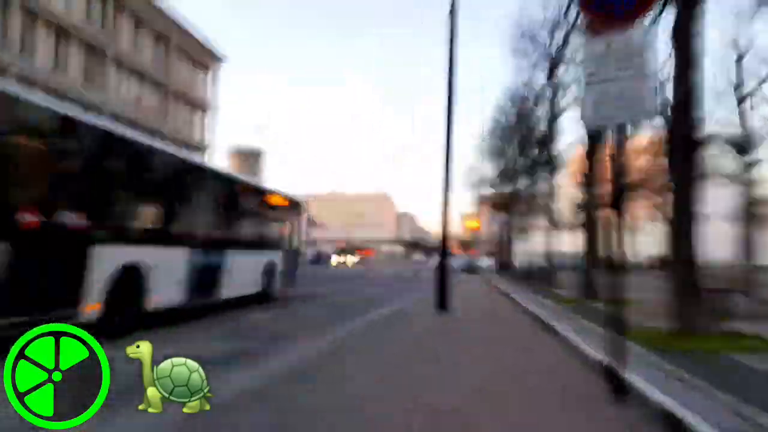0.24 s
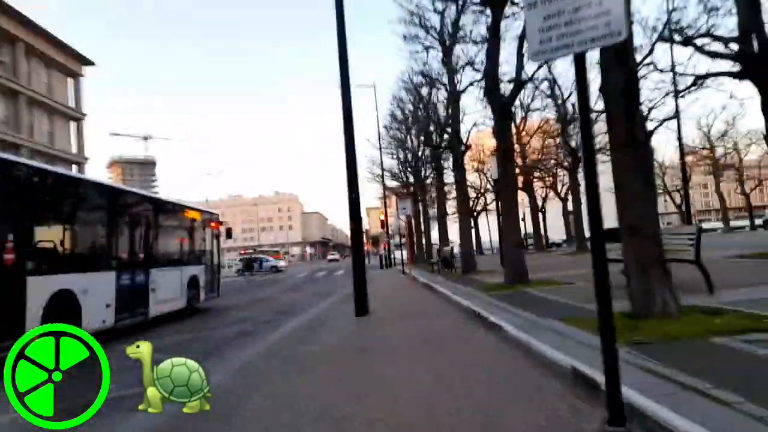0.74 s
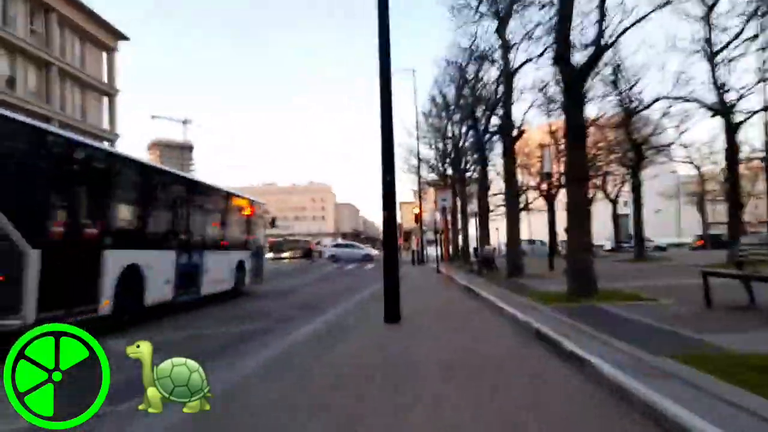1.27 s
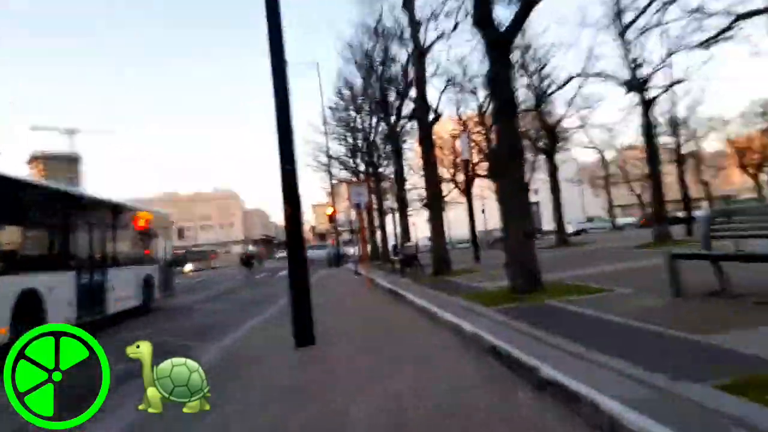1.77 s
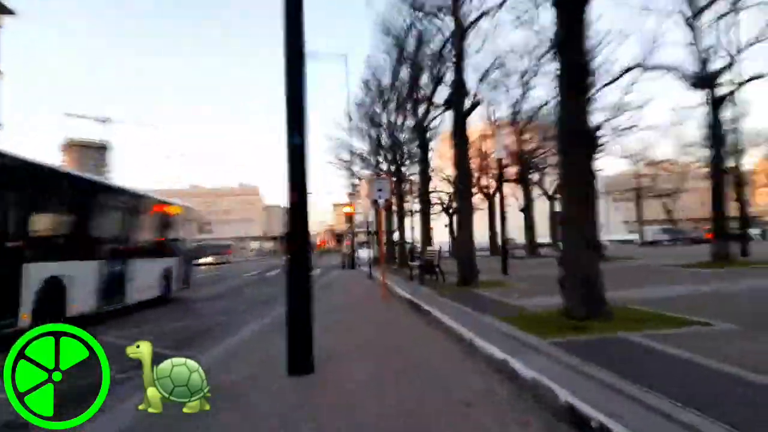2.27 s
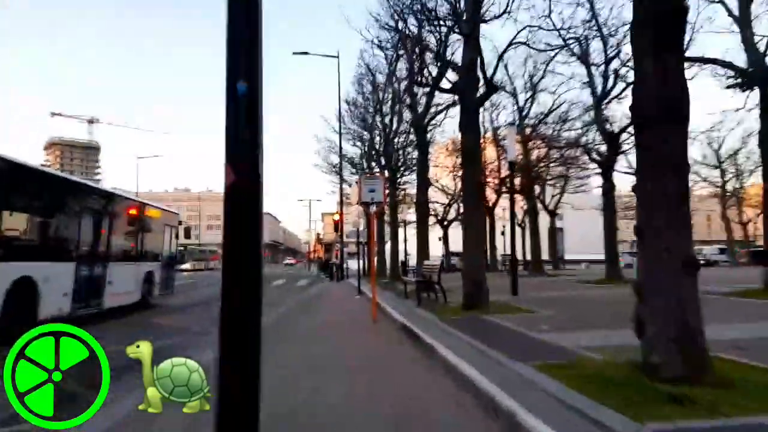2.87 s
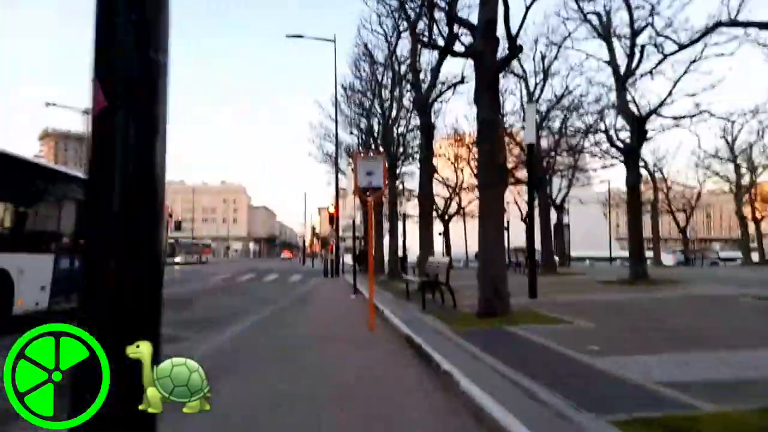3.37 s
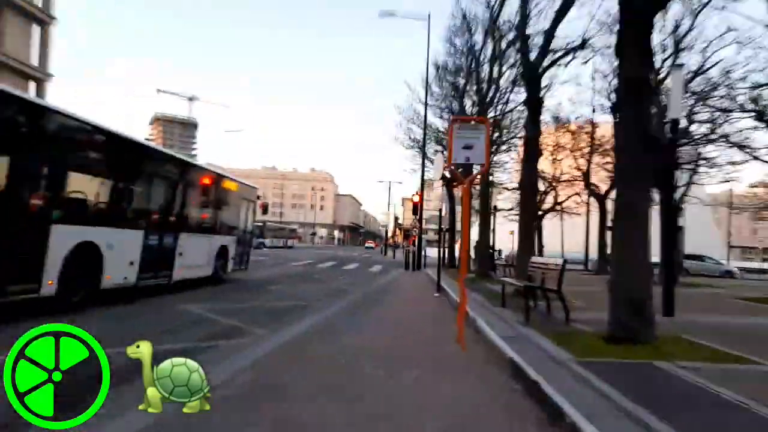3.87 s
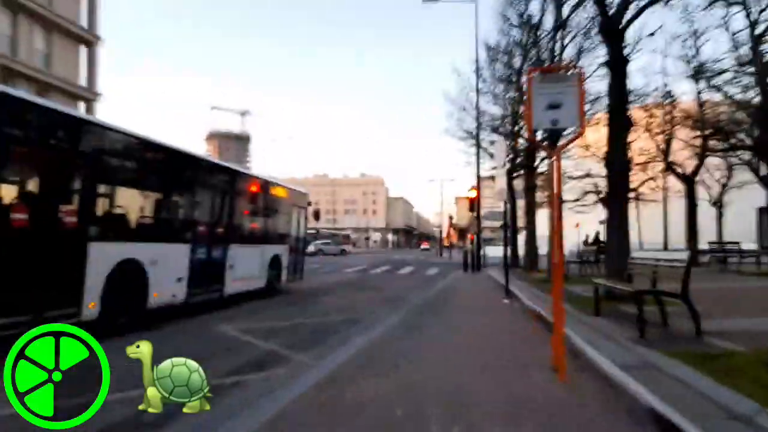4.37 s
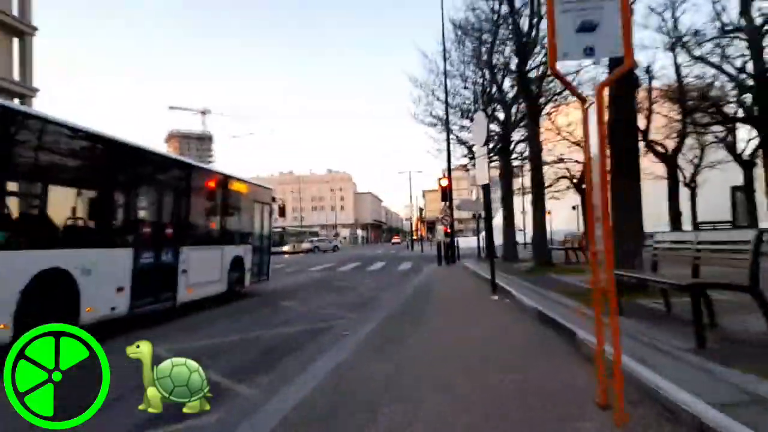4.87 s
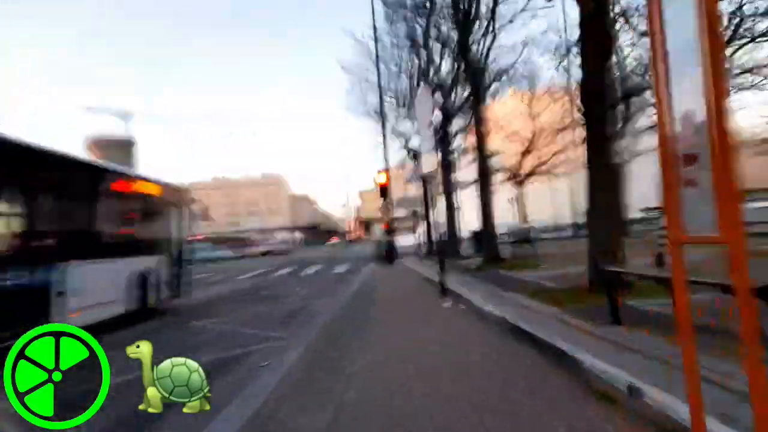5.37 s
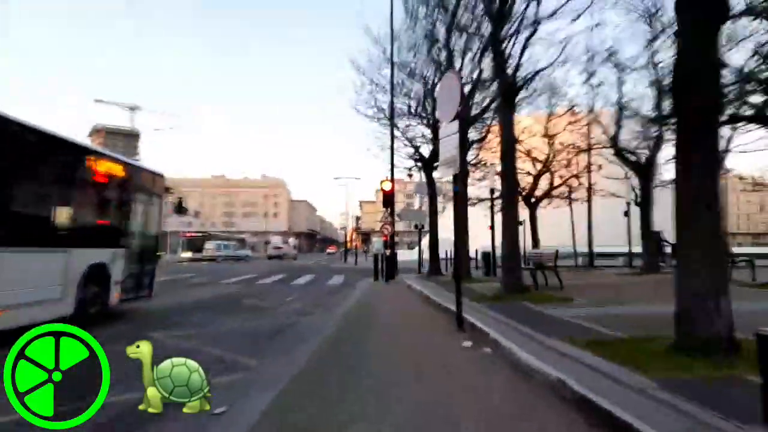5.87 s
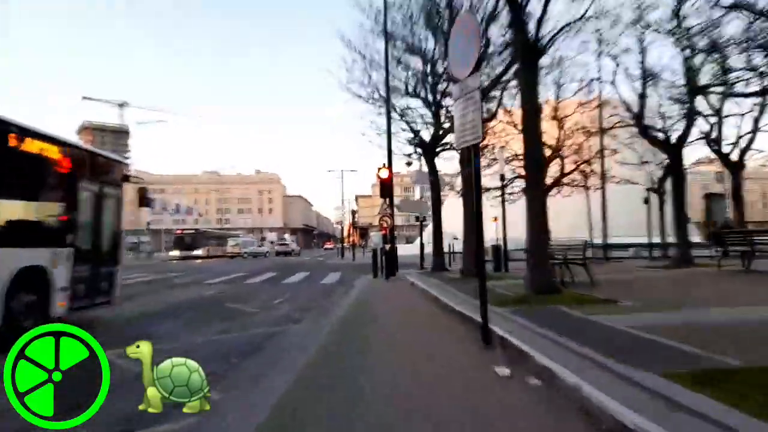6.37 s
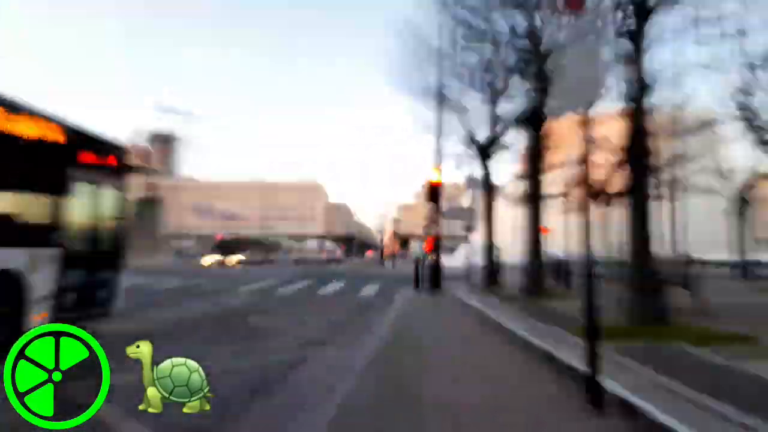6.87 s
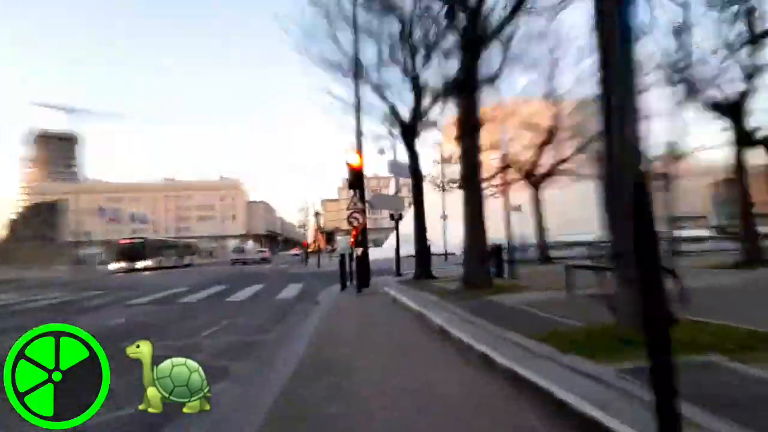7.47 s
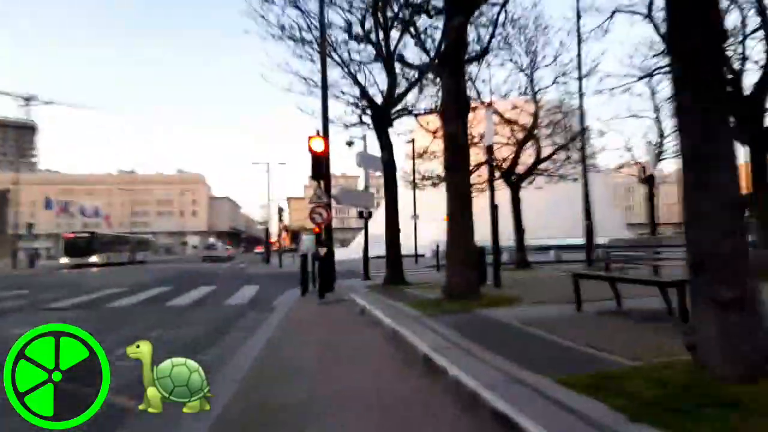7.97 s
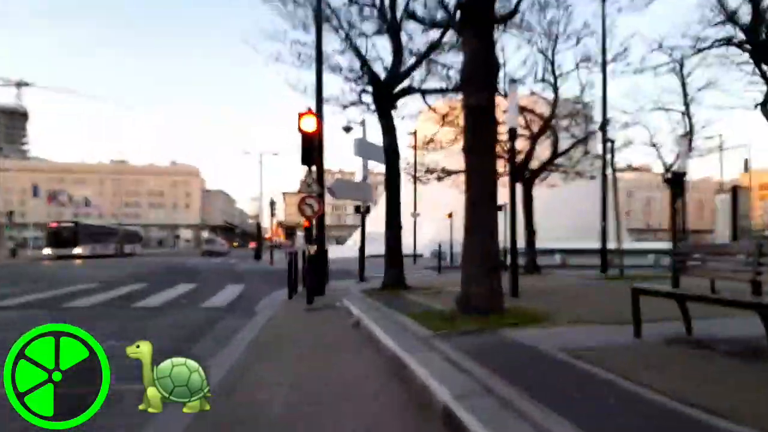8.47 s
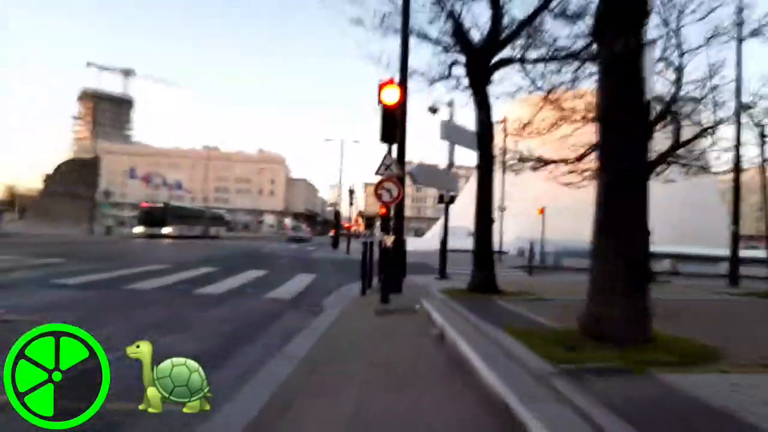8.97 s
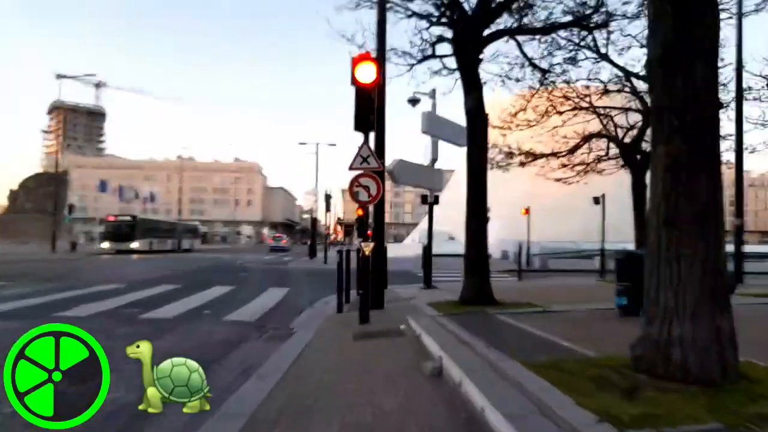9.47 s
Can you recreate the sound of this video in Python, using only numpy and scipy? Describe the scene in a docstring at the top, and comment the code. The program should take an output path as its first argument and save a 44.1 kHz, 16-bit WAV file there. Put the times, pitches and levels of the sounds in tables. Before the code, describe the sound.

Loose scooter parts clatter in uneven bursts over low tyre rumble, with faint motor whine and a bus's hissing wash as it is passed.

```python
"""An electric kick scooter jolts over city pavement beside a slow bus, its tyres rumbling as shaped noise.
From the first jolts on, loose parts chatter as noise bursts and damped modes knock in the stem, then settle.
The hub motor's wavering tone peeks out near 2 s and again near 9 s; thin tones squeal from 3.6 s as distant brakes.
Filtered noise makes the street, swelling near 6.5 s as the bus is overtaken, then dropping away."""
import sys
import numpy as np
from scipy import signal
from scipy.fft import rfft, irfft
from scipy.io import wavfile

SR = 44100
rng = np.random.default_rng(int(sys.argv[2]) if len(sys.argv) > 2 else 0)


def to_wav(sig):
    """Store sig (one row per channel, or 1-D mono) as 16-bit WAV at the path in sys.argv[1].

    Samples outside -1..1 are clipped; the rate is SR.
    """
    pcm = np.clip(np.atleast_2d(sig), -1, 1) * 32767
    pcm = np.round(pcm).astype(np.int16)
    wavfile.write(sys.argv[1], SR, pcm.T)  # frames by channels


N = 429088
SIZE = 4096  # length of a short sound [samples]
LEAD = 640  # room ahead of its main contact [samples]
LEVEL_SPAN = 441  # 10 ms, over which a short sound's energy is counted [samples]
TIME, AGE = np.arange(N) / SR, np.arange(SIZE) / SR  # scene and short-sound clocks [s]

# roughness of the pavement, heard as tyre level: (time [s], level [dB])
ROLL = [(0, -38.5), (0.9, -39), (1.4, -36.5), (4.3, -39.5), (5.5, -44), (6.5, -31), (7.15, -40.5),
        (8.5, -42), (9.7, -33)]
# jolts, a wheel meeting an edge; each layer trims its level and pitch: (blow [s], chatter before [s],
# chatter after [s], rattle level [dB], tick level [dB], thud level [dB], thud pitch [Hz])
JOLTS = [(0.209, 0.016, 0.0082, -15, -39, -23.5, 491), (0.239, 0.016, 0.017, -12, -28, -15.5, 450),
         (0.321, 0.041, 0.0079, -11, -23, -19, 510), (0.428, 0.018, 0.0028, -14.5, -30.5, -21.5, 480),
         (0.458, 0.019, 0.023, -12, -27.5, -14, 426), (0.537, 0.033, 0.0045, -24, -56, -22.5, 323),
         (1.055, 0.002, 0.017, -20.5, -36, -32, 410), (1.091, 0.0, 0.041, -19.5, -27, -18, 380.9),
         (1.458, 0.025, 0.011, -25.5, -53, -28, 295), (1.545, 0.02, 0.01, -18.5, -36, -16.5, 287),
         (1.763, 0.0081, 0.011, -18, -56, -24.5, 450), (1.805, 0.017, 0.011, -17, -24.5, -12, 362),
         (1.868, 0.0028, 0.01, -17.5, -31, -25, 489.6), (1.905, 0.0054, 0.013, -16.5, -26.5, -13, 336),
         (1.99, 0.0034, 0.0098, -18.5, -34, -27, 425.9), (2.16, 0.0, 0.0022, -35, -32, -45, 380),
         (2.23, 0.0, 0.0054, -21, -46, -47, 410), (2.47, 0.011, 0.015, -15, -50, -17.5, 408),
         (2.799, 0.0049, 0.0056, -21.5, -46, -47, 610), (2.95, 0.013, 0.012, -16, -25, -14.5, 374.3),
         (3.169, 0.0039, 0.014, -15, -53, -30, 519), (3.21, 0.011, 0.015, -20, -21, -16.5, 399.5),
         (3.412, 0.0079, 0.0046, -22.5, -35.5, -35, 425.8),
         (3.439, 0.015, 0.002, -19.5, -24.5, -21.5, 444.7), (3.518, 0.0065, 0.0082, -21.5, -39, -40, 348),
         (3.848, 0.014, 0.0031, -20, -41, -24, 400), (4.181, 0.028, 0.019, -11.5, -22, -11.5, 413.2),
         (4.298, 0.0086, 0.0058, -22.5, -46, -31, 368.7), (4.437, 0.01, 0.0076, -12, -29, -22.5, 460.3),
         (4.481, 0.027, 0.00095, -12.5, -35, -13, 476.7), (4.517, 0.001, 0.023, -13.5, -38, -26, 400),
         (4.564, 0.013, 0.0092, -13, -24, -13, 490), (4.698, 0.00063, 0.0041, -26.5, -65, -34, 319),
         (5.027, 0.0013, 0.0044, -20, -32, -23.5, 404.8), (5.36, 0.011, 0.029, -17, -40, -25.5, 428),
         (5.59, 0.011, 0.011, -19.5, -41, -27.5, 412), (6.342, 0.018, 0.037, -20, -31.5, -27, 351.5),
         (6.419, 0.0, 0.0047, -22, -44, -27, 278.5), (6.492, 0.027, 0.003, -18.5, -41, -21, 351.7),
         (6.536, 0.02, 0.0059, -12.5, -26, -15.5, 358.9), (6.554, 0.0, 0.01, -17, -25, -19.5, 349.8),
         (6.619, 0.0, 0.014, -16.5, -36, -32, 446), (6.662, 0.005, 0.037, -16, -24.5, -15, 362.2),
         (6.821, 0.012, 0.011, -14, -30, -17, 437), (6.854, 0.012, 0.0037, -15.5, -24, -23, 371.2),
         (6.869, 0.00088, 0.032, -16.5, -46, -14, 492.6), (6.925, 0.02, 0.014, -16.5, -24.5, -10.5, 446.3),
         (6.97, 0.00049, 0.024, -16.5, -36, -31, 440), (7.011, 0.012, 0.024, -13.5, -23, -14.5, 460),
         (7.383, 0.0002, 0.012, -24.5, -37, -19.5, 323.3),
         (7.464, 0.0041, 0.0093, -24.5, -63, -27.5, 296.5),
         (7.602, 0.015, 0.0098, -22.5, -38.5, -21, 329.5), (7.711, 0.0038, 0.011, -21.5, -38, -34, 399.8),
         (7.754, 0.0056, 0.015, -21.5, -24.5, -17.5, 321.7), (8.04, 0.026, 0.016, -17.5, -24.5, -12, 395),
         (8.105, 0.0097, 0.0012, -20.5, -62, -33, 359.5), (8.127, 0, 0.0074, -20.5, -29.5, -18.5, 302.1),
         (8.241, 0.032, 0.0014, -20.5, -42, -27.5, 328.9),
         (8.324, 0.0032, 0.0094, -17.5, -27.5, -14.5, 356.2),
         (8.814, 0.0023, 0.011, -25, -56, -20.5, 261.1), (8.879, 0.000011, 0.011, -26, -51, -20.5, 270),
         (8.913, 0.001, 0.0067, -24, -62, -21.5, 281.4), (9.306, 0.03, 0.0039, -21, -52, -25, 273),
         (9.618, 0.0049, 0.049, -11, -47, -13, 450.7)]

# steady far traffic, and the bus that swells as it draws level and drops away behind
TRAFFIC_DB = -50
BUS_S, BUS_DB, BUS_RISE_DB_PER_S, BUS_FALL_DB_PER_S = 6.484, -42.5, 8.5, 17

BOUNCE_S = 0.014  # chatter time that each clack stands for
CLACK_HZ, CLACK_DB = 1910, -19.5  # brightness and level of a middling clack
BRIGHTER_OCT_PER_DB, DULLER_OCT_PER_S = 0.07, 11  # hard clacks are brighter, late ones duller


def amp(db):
    """Decibels to gain."""
    return 10 ** (np.asarray(db) / 20)


def evened(x):
    """Scales to rms 1."""
    return x / np.sqrt(np.mean(x ** 2) + 1e-20)


def read(points, hz):
    """Reads a spectrum table on a log-frequency axis."""
    f, value = np.transpose(points)
    return np.interp(np.log(hz + 1), np.log(f), value)


def curve(rows, axis=1):
    """One column of a time table, at every sample."""
    table = np.array(rows)
    return np.interp(TIME, table[:, 0], table[:, axis])


def drift(per_s):
    """Slow random wander of rms 1, with per_s turning points a second."""
    knots = rng.standard_normal(SIZE)
    return evened(np.interp(TIME * per_s, np.arange(SIZE), knots))


def white_pair(count, likeness):
    """Two channels of white noise; likeness is the share of power they have in common."""
    z = rng.standard_normal((3, count))
    return np.sqrt(likeness) * z[0] + np.sqrt(1 - likeness) * z[1:]


def noise(points, likeness):
    """Two channels of noise coloured by a spectrum table, rms 1."""
    gain = amp(read(points, np.fft.rfftfreq(N, 1 / SR)))
    return evened(irfft(rfft(white_pair(N, likeness)) * gain, N))


def tone(hz, waver):
    """A sine of rms 1 with wavering pitch and a random phase in each channel."""
    turns = np.cumsum(hz * (1 + waver * drift(per_s=57))) / SR
    return np.sqrt(2) * np.sin(2 * np.pi * (turns + rng.random((2, 1))))


def causal(points):
    """Minimum-phase response of a spectrum table: it rings only after the blow."""
    log_gain = np.log(amp(read(points, abs(np.fft.fftfreq(SIZE, 1 / SR)))))
    return np.exp(np.conj(signal.hilbert(log_gain)))[:SIZE // 2 + 1]


def levelled(spectrum, db, pan_db):
    """A short sound with the energy of 10 ms at the given level; pan_db is left over right."""
    sound = irfft(spectrum) * amp([[pan_db / 2], [-pan_db / 2]])
    return amp(db) * sound * np.sqrt(2 * LEVEL_SPAN / np.sum(sound ** 2))


def add(mix, s, sound):
    """Mixes a stereo sound in, its main contact at time s."""
    part = mix[:, max(round(s * SR) - LEAD, 0):][:, :sound.shape[1]]
    part += sound[:, :part.shape[1]]


def traffic_db():
    """Level of the street: the power of the bus's swell added to the steady traffic."""
    rise_db = BUS_RISE_DB_PER_S * (BUS_S - TIME)
    fall_db = BUS_FALL_DB_PER_S * (TIME - BUS_S)
    bus_db = BUS_DB - np.maximum(rise_db, fall_db)
    return 10 * np.log10(amp(TRAFFIC_DB) ** 2 + amp(bus_db) ** 2)


def street(level_db=5.3, swell_db=2.04, hiss_db=-63.0, near_db=-42, grain_db=2.5):
    """The wash of traffic, joined by the bus's grainy hiss as it comes close, with a fine hiss on top."""
    # colour of the street's wash: (frequency [Hz], level [dB])
    wash_colour = [(100, 11), (500, 7), (1000, 12), (1400, 6), (2000, -0.5), (3400, -12.5), (5300, -18),
                   (6500, -23.5), (8500, -41.5)]
    # colour of the bus's hiss close by: (frequency [Hz], level [dB])
    bus_colour = [(800, -18), (2300, 11.5), (2900, 13.5), (3600, 4.5), (4500, 10), (5050, 5.5), (5600, 6.5),
                  (6600, -7.5), (8000, -17), (9500, -50)]
    # colour of the steady fine hiss: (frequency [Hz], level [dB])
    hiss_colour = [(3000, -16), (5200, 11.5), (7000, -14), (8600, -37), (10500, -6), (13000, 2.5),
                   (14500, -1), (15200, -19), (16500, -22)]
    db = traffic_db()
    wash = noise(wash_colour, likeness=0.015) * amp(level_db + db + swell_db * drift(per_s=21))
    # the close hiss rises more steeply than the wash, in decibels
    close_db = near_db + 2.2 * (db - BUS_DB) + grain_db * drift(per_s=110)
    close = noise(bus_colour, likeness=0) * amp(close_db)
    return wash + close + amp(hiss_db) * noise(hiss_colour, likeness=0)


def brakes(flutter_db=5.0):
    """Distant brakes: thin, wavering tones that flutter as they fade in and out."""
    # brake squeals: (start [s], end [s], pitch [Hz], level [dB])
    squeals = [(3.62, 4.5, 7106, -79), (5.2, 5.48, 7140, -63), (7.92, 8.68, 5680, -59)]
    out = np.zeros((2, N))
    for start, end, hz, db in squeals:
        gate = np.clip(np.minimum(TIME - start, end - TIME) / 0.31, 0, 1)
        out += gate * amp(db + flutter_db * drift(per_s=45)) * tone(hz, waver=0.00197)
    return out


def motor(flutter_db=3):
    """The hub motor's faint whine: one wavering tone that glides in pitch and level."""
    # course of the whine: (time [s], pitch [Hz], level [dB])
    whine = [(1.85, 1230, -74), (2.1, 1266, -52), (2.5, 1253, -76), (8.2, 1458, -76), (8.6, 1450, -63),
             (8.85, 1374, -40.5), (9.1, 1371, -58)]
    level_db = curve(whine, axis=2) + flutter_db * drift(per_s=8)
    return amp(level_db) * tone(curve(whine), waver=0.0122)


def tyres(level_db=0.0, lumps_db=3, left_db=-3):
    """A lumpy rumble of low noise that follows the roughness of the pavement."""
    # colour of the rumble: (frequency [Hz], level [dB])
    rumble_colour = [(20, -50), (40, -1), (60, -8), (115, 4.5), (170, -2), (280, -0.5), (450, -2.5),
                     (900, -13), (2000, -75)]
    rumble_db = level_db + curve(ROLL) + lumps_db * drift(per_s=29)
    return noise(rumble_colour, likeness=0.64) * amp(rumble_db + np.array([[left_db], [0]]))


def contacts(early_s=.004, late_s=0.0055, bounce=0.18, uneven_db=5, count=7):
    """Spectrum of one hard contact with small ones around it."""
    delay = late_s * rng.exponential(1, count) - early_s * rng.random(count)
    at = np.clip(LEAD + delay * SR, 0, SIZE // 2).astype(int)
    train = np.zeros((2, SIZE))
    train[:, at] = bounce * rng.standard_normal(count) * amp(uneven_db * rng.standard_normal((2, count)))
    train[:, LEAD] += 1
    return rfft(train)


def chatter(rise_s, fall_s, uneven_db=5, per_s=1400):
    """Spectrum of crowded small contacts that swell and die around the middle of a rattle."""
    t = AGE - LEAD / SR
    rise = np.exp(-(t / rise_s / 2) ** 2)
    # a fast fall, then a weak, slower tail
    fall = np.exp(-abs(t) / fall_s) + amp(-24) * np.exp(-abs(t) / .02)
    swell = np.where(t < 0, rise, fall)
    hits = (rng.random(SIZE) < per_s / SR) * rng.choice([-1, 1], SIZE)
    return rfft(hits * swell * amp(uneven_db * rng.standard_normal((2, SIZE))))


def shell(t60, likeness):
    """Spectrum of a plastic housing's crowded modes, as noise that falls 60 dB in t60 seconds."""
    return rfft(white_pair(SIZE, likeness) * amp(-60 * AGE / t60))


def ringing(width_hz=150, strength=0.6):
    """Resonances of the parts; each rattle wakes them by different amounts."""
    # ringing modes of the loose parts: (frequency [Hz])
    modes = [1210, 2340, 2970, 3730, 5540]
    hz = np.fft.rfftfreq(SIZE, 1 / SR)
    return 1 + sum(strength * rng.standard_normal() / (1 + 2j * (hz - mode) / width_hz) for mode in modes)


def thud(hz, octaves=0.55, cycles=10.8, channel_phase=1.015, count=9):
    """Spectrum of the stem's damped modes, strengths and signs set by chance; 60 dB down after `cycles`."""
    spread = np.linspace(-2, 1.4, count) + 0.23 * rng.standard_normal(count)
    f = np.clip(hz * 2 ** (octaves * spread), 70, 1300)[:, None]
    signed = np.exp(-spread ** 2 / 4) * rng.choice([-1, 1], count)
    weight = np.sqrt(f) * signed[:, None]
    phase = channel_phase * rng.standard_normal((2, count, 1))
    ring = weight * np.sin(2 * np.pi * f * AGE + phase) * amp(-60 * AGE * f / cycles)
    onset = 1 - np.exp(-AGE / 0.00052)
    return rfft(ring.sum(axis=1) * onset)


def rattles(rows, level_db=-1.0, left_db=1.5, scatter_db=2.5, tilt_db=7, usual_hz=1850,
            rise_s=0.0017, fall_s=0.0062):
    """Bursts of chatter ring through the housing, brighter or duller by row."""
    # colour of the rattling parts: (frequency [Hz], level [dB])
    clatter_colour = [(350, -9.5), (700, 1), (1200, 5), (1700, -5), (2500, -3), (3300, -12), (5400, -15),
                      (6500, -28.5), (8500, -47.5), (13000, -33), (16500, -47)]
    out, colour = np.zeros((2, N)), causal(clatter_colour)
    octave = np.log2(np.clip(np.fft.rfftfreq(SIZE, 1 / SR), 900, 6000) / usual_hz)
    for s, db, hz in rows:
        tilt = amp(tilt_db * np.log2(hz / usual_hz) * octave)
        body = shell(t60=0.0037, likeness=0.12) * ringing() * colour
        spectrum = chatter(rise_s, fall_s) * body * tilt
        add(out, s, levelled(spectrum, db + level_db, left_db + scatter_db * rng.standard_normal()))
    return out


def ticks(rows, level_db=3.0, left_db=2.5, scatter_db=7.5):
    """Dry clicks through the housing, each with faint bounces around it."""
    # colour of the ticks: (frequency [Hz], level [dB])
    tick_colour = [(700, 6.5), (2000, 10.5), (5400, -0.5), (6800, -7.5), (8500, -18.5), (10000, -8.5),
                   (13000, 1.5), (16500, -12)]
    out, colour = np.zeros((2, N)), causal(tick_colour)
    for s, db in rows:
        spectrum = contacts() * shell(t60=0.0026, likeness=0.097) * colour
        add(out, s, levelled(spectrum, db + level_db, left_db + scatter_db * rng.standard_normal()))
    return out


def thuds(rows, level_db=0, left_db=2.5, scatter_db=-1.5):
    """Blows from the wheels travel up the stem and wake its modes."""
    # colour of the stem: (frequency [Hz], level [dB])
    stem = causal([(30, -24.5), (80, -1.5), (900, 1.0), (1600, 15.5), (4000, -37)])
    out = np.zeros((2, N))
    for s, db, hz in rows:
        spectrum = contacts() * stem * thud(hz)
        add(out, s, levelled(spectrum, db + level_db, left_db + scatter_db * rng.standard_normal()))
    return out


def grit(per_s, level_db, spread_db, count=300):
    """Times and levels of chance small bumps, stronger where the pavement is rough."""
    gap, size = rng.exponential(1, (2, count))
    times = np.cumsum(gap) / per_s
    db = np.interp(times, *np.transpose(ROLL)) + level_db + spread_db * np.minimum(size, 3)
    return np.transpose([times, db])[times < TIME[-1]]


def jiggle():
    """Grit keeps the scooter ticking, buzzing and bumping softly between the knocks."""
    buzzes = grit(per_s=12, level_db=-5, spread_db=2)
    bumps = grit(per_s=14, level_db=-1.5, spread_db=4.0)
    clicks = ticks(grit(per_s=7.8, level_db=-7.5, spread_db=-1.5))
    buzzing = rattles(np.c_[buzzes, rng.uniform(1400, 2600, len(buzzes))])
    return clicks + buzzing + thuds(np.c_[bumps, rng.uniform(70, 230, len(bumps))])


def small_knocks(tap_db=-19.5, buzz_db=-11, buzz_hz=2300, bump_db=-6):
    """Between jolts a part taps and buzzes briefly, or a wheel bumps softly."""
    # light taps of a loose part, before the trims: (time [s], level [dB])
    taps = [(0.3566, -31), (0.6428, -24.5), (0.9272, -34), (1.1595, -26.5), (1.1734, -21.5), (1.3425, -27),
            (1.3724, -23.5), (1.3938, -22.5), (2.0235, -17), (2.1112, -24), (2.3171, -27), (2.6598, -19.5),
            (2.7637, -21.5), (3.0127, -22.5), (3.0672, -17.5), (3.1082, -20), (3.8696, -23), (4.2497, -24),
            (4.3413, -21), (4.6016, -22), (5.005, -20.5), (7.4339, -22), (7.8262, -25), (7.9112, -19.5),
            (7.9935, -25), (8.7096, -24.5), (8.8543, -23.5), (8.9715, -19), (9.4441, -22)]
    # soft bumps that shake nothing loose, before the trim: (time [s], level [dB], pitch [Hz])
    bumps = [(0.944, -25, 247.4), (1.413, -23, 133), (2.179, -27, 117.6), (2.693, -18, 117.9),
             (2.766, -21, 284.5), (3.544, -20.5, 113.1), (3.961, -23, 178.1), (7.193, -23, 129.3),
             (7.337, -17.5, 126.9), (7.943, -15.5, 282.2), (8.749, -24, 118), (9.014, -15, 112.7),
             (9.154, -22, 115.7), (9.558, -23, 113), (9.689, -16, 117.9)]
    s, db = np.transpose(taps)
    buzzes = rattles(np.c_[s, db + buzz_db, np.full(len(s), buzz_hz)], rise_s=0.00038, fall_s=0.002)
    return ticks(np.c_[s, db + tap_db]) + buzzes + amp(bump_db) * thuds(bumps)


def settling(gap_s=0.015, below_db=-15, fall_db_per_s=120, uneven_db=3, click_db=-16, buzz_hz=1650,
             count=3):
    """After each jolt the parts come to rest in a few bounces that weaken with time."""
    s, _, after, rattle_db = np.transpose(JOLTS)[:4, :, None]
    when, size = rng.standard_normal((len(s), 2, count)).transpose(1, 0, 2)
    age = gap_s * np.cumsum(np.exp(0.3 * when), axis=1)
    at = (s + after + age).ravel()
    db = (rattle_db + below_db - fall_db_per_s * age + uneven_db * size).ravel()
    buzzes = rattles(np.c_[at, db, np.full(len(at), buzz_hz)], rise_s=0.0011)
    return buzzes + ticks(np.c_[at, db + click_db])


def clacks(jitter_s=0.0008, uneven_db=2.5, inset=0.2):
    """Loose parts bounce at an uneven beat through each jolt and share its energy.

    Columns: (time [s], rattle [dB], tick [dB], thud [dB], pitch [Hz], time after the blow [s])."""
    rows = []
    for s, before, after, rattle_db, tick_db, thud_db, hz in JOLTS:
        count = int(np.clip(np.ceil((before + after) / BOUNCE_S), 1, 6))
        when, size = rng.standard_normal((2, 6))[:, :count]
        place = (np.arange(count) + inset) / (count - 1 + 2 * inset)
        age = place * (before + after) - before + jitter_s * when
        db = uneven_db * size
        db -= 10 * np.log10(np.sum(amp(db) ** 2))  # the shares add up to the jolt's energy
        rows.append(np.c_[s + age, rattle_db + db, tick_db + db, thud_db + db, np.full(count, hz), age])
    return np.vstack(rows)


def rebounds(s, db, late_s=0.0052, spread_s=0.0076, below_db=-25, uneven_db=2.0, count=2):
    """Every clack's rattle comes with a few small hard clicks of its own."""
    s, db = np.repeat([s, db], count, axis=1)
    when, size = rng.standard_normal((len(s), 2)).T
    return ticks(np.c_[s + late_s + spread_s * when, db + below_db + uneven_db * size])


def loose_parts(rattle_db=-0.8, click_db=0, knock_db=-6, knock_ratio=1.114):
    """Each clack is a short rattle with a hard click and a light knock in the stem."""
    s, db, tick_db, thud_db, hz, age = clacks().T
    bright_hz = CLACK_HZ * 2 ** (BRIGHTER_OCT_PER_DB * (db - CLACK_DB) - DULLER_OCT_PER_S * age)
    rattling = rattles(np.c_[s, db + rattle_db, bright_hz]) + rebounds(s, db)
    knocks = thuds(np.c_[s, thud_db + knock_db, hz * knock_ratio])
    return rattling + ticks(np.c_[s, tick_db + click_db]) + knocks


def blows(click_db=0, knock_db=-0.5, pitch_ratio=1.018, boom_db=-23, boom_share=0.35, boom_hz=105,
          crack_db=-6.0, crack_hz=2700):
    """In each jolt the stem hits the end of its play: bright crack, tick, thud and soft boom of the deck."""
    s, _, _, rattle_db, tick_db, thud_db, hz = np.transpose(JOLTS)
    bright_hz = crack_hz * 2 ** (BRIGHTER_OCT_PER_DB * (rattle_db - CLACK_DB))
    crack = rattles(np.c_[s, crack_db + rattle_db, bright_hz], rise_s=0.00069, fall_s=0.0029)
    click = ticks(np.c_[s, tick_db + click_db])
    knock = thuds(np.c_[s, thud_db + knock_db, hz * pitch_ratio])
    boom = thuds(np.c_[s, boom_db + boom_share * thud_db, np.full(len(s), boom_hz)], left_db=-8)
    return crack + click + knock + boom


def scene():
    """The scooter in its street."""
    steady = street() + brakes() + motor() + tyres()
    return steady + jiggle() + small_knocks() + settling() + loose_parts() + blows()


def record(dry):
    """The hardest peaks clip; then a steep low-pass limits the band."""
    taps = signal.firwin(511, 16300, window=("kaiser", 9), fs=SR)  # cutoff [Hz]
    return signal.oaconvolve(np.clip(dry, -1, 1), taps[None], "same")


dry = scene()
out = record(dry)
to_wav(out)
```